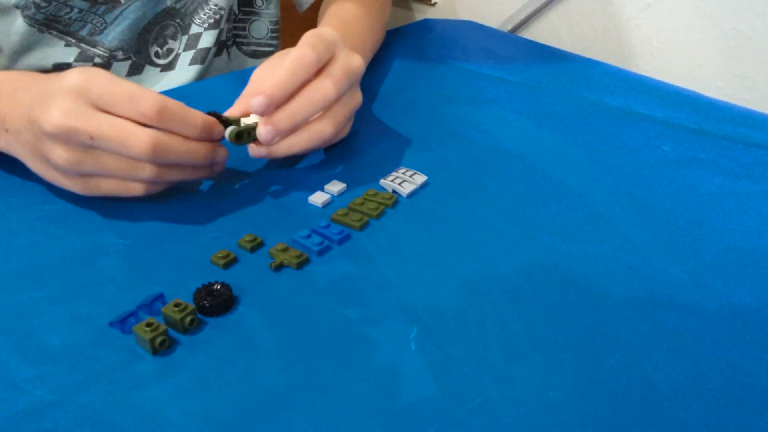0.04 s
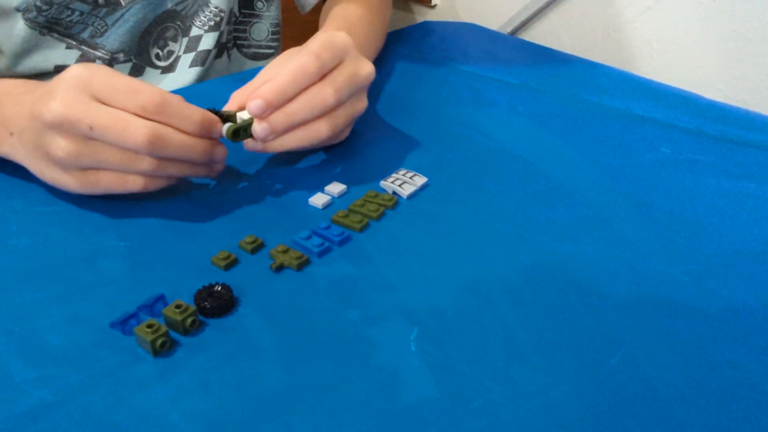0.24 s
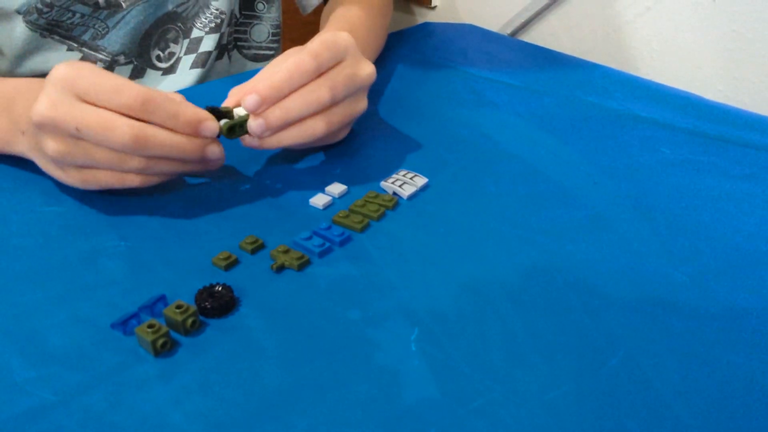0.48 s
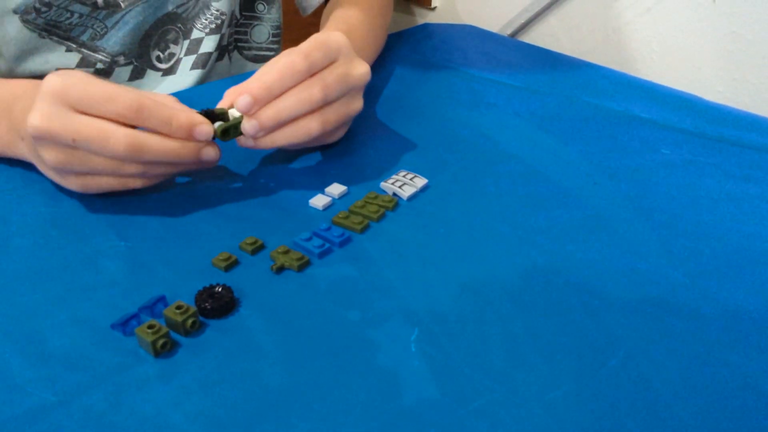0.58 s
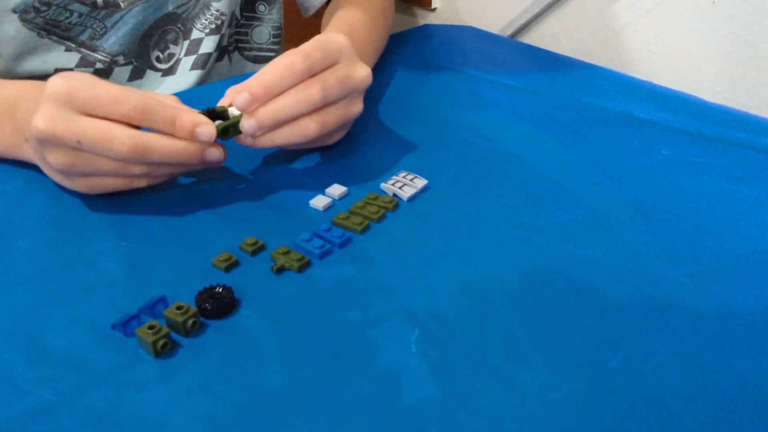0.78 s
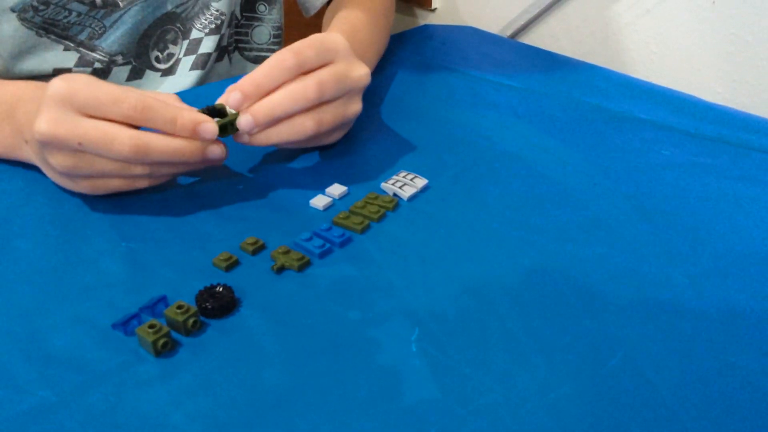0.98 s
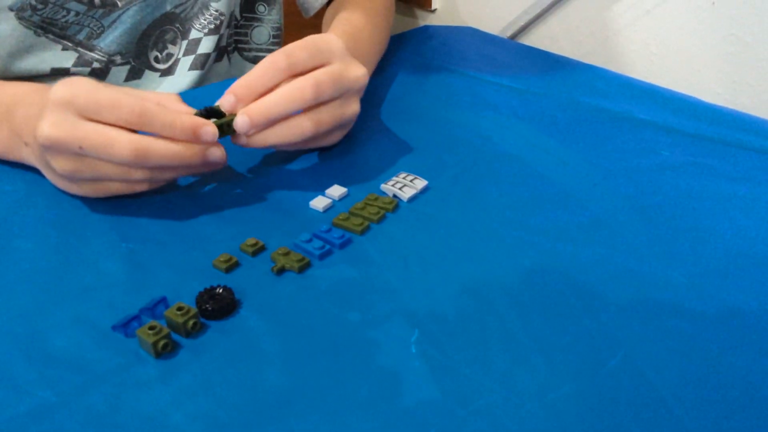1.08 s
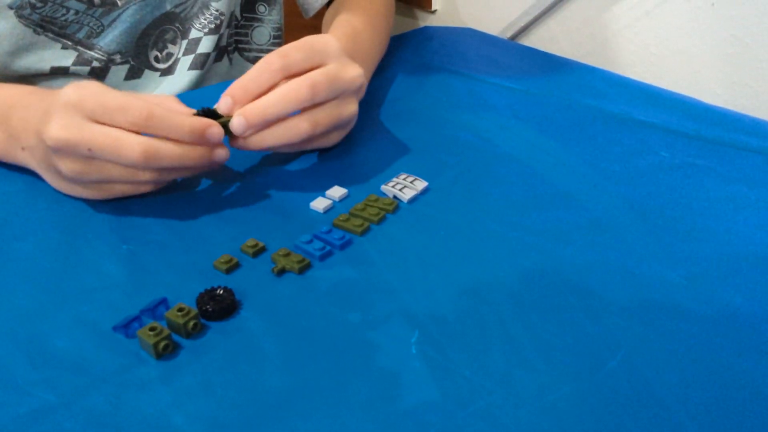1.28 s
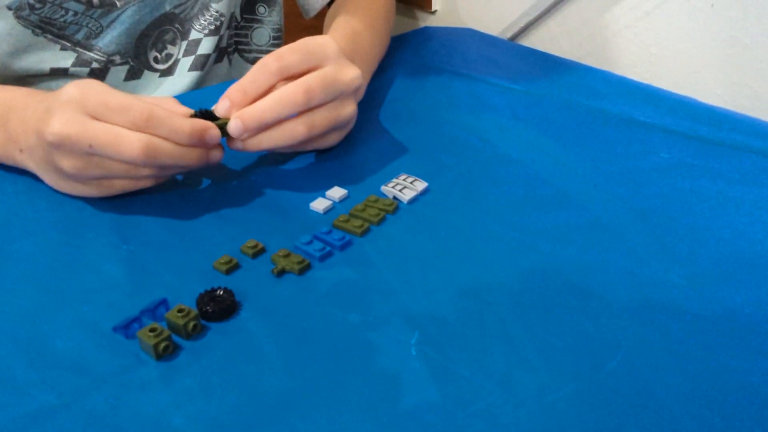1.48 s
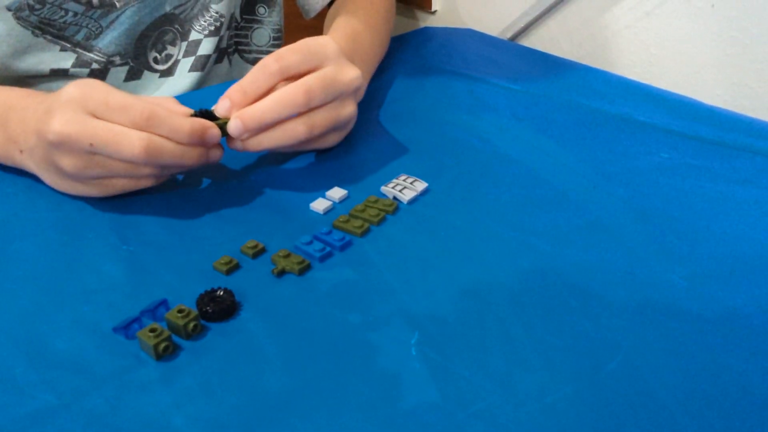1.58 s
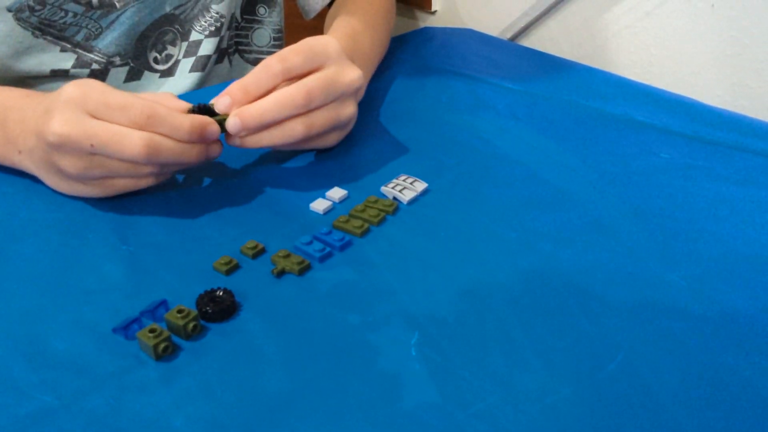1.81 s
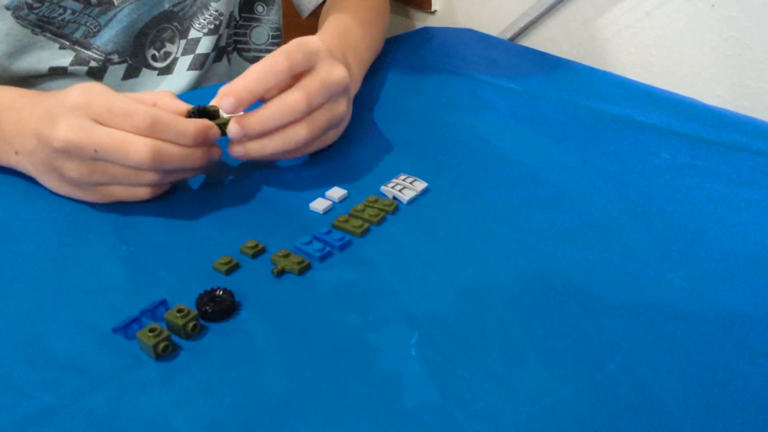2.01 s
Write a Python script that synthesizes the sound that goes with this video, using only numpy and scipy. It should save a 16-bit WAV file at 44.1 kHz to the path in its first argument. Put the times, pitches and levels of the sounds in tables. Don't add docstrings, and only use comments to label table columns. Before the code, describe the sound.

Hollow clattering knocks come in uneven bursts and end in a fast rattle, then quiet, one short plastic snap close to the microphone right of centre, and faint dull bumps over soft room hum.

```python
import sys
import numpy as np
from scipy import signal
from scipy.fft import rfft, irfft
from scipy.io import wavfile
from scipy.ndimage import uniform_filter1d, minimum_filter1d

SR = 44100
rng = np.random.default_rng(int(sys.argv[2]) if len(sys.argv) > 2 else 0)


def gain_from_decibels(decibels):
    exponent = np.asarray(decibels, float) / 20
    return 10 ** exponent


def persist_wave(psi):
    counts = np.round(np.clip(psi, -1, 1) * 32767).astype(np.int16)
    wavfile.write(sys.argv[1], SR, np.atleast_2d(counts).T)


N = 90404

TAIL, LEAD = 20480, 1024
TAIL_S = np.arange(TAIL) / SR
TAIL_HZ = np.maximum(np.arange(TAIL // 2 + 1) * SR / TAIL, 1)
LEFT_RIGHT = np.array([[1], [-1]])
BOUNCE_DIRECT_DB = 2
SHEEN_DB = 9.5


def level(x, db):
    return x * gain_from_decibels(db) / np.sqrt(np.mean(x ** 2))


def read(table, hz):
    t = np.array(table)
    return np.interp(np.log(np.maximum(hz, 1)), np.log(t[:, 0]), t[:, 1])


def causal(db):
    c = irfft(db * np.log(10) / 20)
    c[1:len(c) // 2] *= 2
    c[len(c) // 2 + 1:] = 0
    return np.exp(rfft(c))


def walk(rate_hz):
    k = int(SR / rate_hz)
    steps = np.repeat(rng.standard_normal(N // k + 1), k)
    return 2 * uniform_filter1d(uniform_filter1d(steps, k), k)[:N]


def ears(pan_db):
    return gain_from_decibels(LEFT_RIGHT * pan_db / 2)


def bump(centre_hz, width, db):
    return db / (1 + (np.log(TAIL_HZ / centre_hz) / width) ** 2)


def tilt(bright_db, thump_db):
    knee_hz = 910
    octaves = np.log2(np.maximum(TAIL_HZ, 40) / knee_hz)
    return bright_db * np.clip(octaves, 0, 2.8) - thump_db * np.clip(octaves, -2, 0)


def heard(spectrum):
    x = np.roll(irfft(spectrum), LEAD, axis=1)[:, :int(.44 * SR)]
    return x * np.minimum(np.arange(x.shape[1]) / LEAD * 2, 1)


def add(out, x, s):
    i = int(s * SR) - LEAD
    out[:, i:i + x.shape[1]] += x[:, :N - i]


def room(direct_db, build_s=0.00067):
    # (frequency [Hz], time to fall 60 dB [s], left-right likeness [0-1],
    # left minus right [dB])
    bands = [(90.8, 0.86, 1, -10), (172, 0.46, .95, 2), (328, 0.32, 0.9, -4), (707, 0.37, 0.2, -3.5),
             (1480, 0.34, 0.03, -8.5), (2828, 0.42, 0, -8), (5600, 0.3, 0.18, -8), (11314, 0.46, 0.5, -2.5)]
    fade_s, lag_s, scatter_db = .09, 0.00019, 1.6
    patchy = gain_from_decibels(scatter_db * np.repeat(rng.standard_normal(TAIL // 128), 128))
    envelope = patchy * (1 - np.exp(-TAIL_S / build_s)) * gain_from_decibels(-(TAIL_S / fade_s) ** 2)
    mid, side = rng.standard_normal((2, TAIL)) * envelope
    centres = np.log([row[0] for row in bands])
    out = 0
    for k, (_, t60, alike, pan_db) in enumerate(bands):
        share = np.interp(np.log(TAIL_HZ), centres, np.arange(len(bands)) == k)
        c = np.clip(alike, -.9, .999)
        pair = np.sqrt(1 + c) * mid + np.sqrt(1 - c) * side * LEFT_RIGHT
        pair = pair * gain_from_decibels(-60 * TAIL_S / t60)
        pair[1, 0] += gain_from_decibels(direct_db)
        pair[0, int(lag_s * SR)] += gain_from_decibels(direct_db)
        out = out + share * rfft(pair) * ears(pan_db) / np.sqrt(SR * .03)
    return out


def blow(bright_db, thump_db, hollow_hz, sheen_db=0):
    # (frequency [Hz], level [dB])
    body = [(40, -35), (120, -9), (170, -8), (350, 1.5), (500, 4.5), (800, -0.5), (2400, -7.5),
            (3300, -27.5)]
    # (frequency [Hz], level [dB])
    mic = [(3300, 9), (4400, 5), (6800, -8.5), (8000, -18), (9700, -15), (12500, -32), (15200, -22.5),
           (16500, -41.5)]
    db = read(body, TAIL_HZ) + read(mic, TAIL_HZ) + tilt(bright_db, thump_db)
    hollow = bump(hollow_hz, .16, 9)
    sheen = bump(9500, 0.066, sheen_db)
    return causal(db + hollow + sheen)


def air():
    # (frequency [Hz], level [dB per Hz])
    tone = [(25, -26.5), (55, -8), (90, -5), (140, -14.5), (450, -22), (750, -35.5), (3000, -45.5),
            (16000, -61)]
    flicker_db, alike_hz = 1.2, 900
    hum_hz, hum_width_hz = 82, 6.7
    hz = np.maximum(np.arange(N // 2 + 1) * SR / N, 1)
    swell = walk(4.2)
    out = 0
    for centre in 30 * 2 ** np.arange(0, 9.6, .5):
        band = np.maximum(1 - np.abs(np.log2(hz / centre)) * 2, 0) ** .5
        shape = gain_from_decibels(read(tone, hz)) * band
        mid, side = irfft(rfft(rng.standard_normal((2, N))) * shape, N)
        flicker = gain_from_decibels(flicker_db * (walk(10) + .5 * swell))
        out = out + flicker * (mid + min(centre / alike_hz, 1) * side * LEFT_RIGHT)
    hum = irfft(rfft(rng.standard_normal(N)) / (1 + ((hz - hum_hz) / hum_width_hz) ** 2), N)
    return level(out, -59) + level(hum, -57)


def knocks():
    # (time [s], level [dB], brightness above the knee [dB per octave],
    # thump below the knee [dB per octave], hollow resonance [Hz])
    hits = [(0.2034, -14.5, 3, 1, 516), (.5125, -17.5, 7.5, 0.5, 1016), (.675, -16.5, -0.5, 0, 393),
            (.7585, -23, 4.5, -1.5, 2030), (.193, -42, 1, -6.5, 1500), (0.2144, -19.5, -0.5, 2.5, 506),
            (.233, -21.5, 5, 2.5, 520), (0.2451, -20, -2, -2, 500), (.259, -19.5, 2, 1.5, 1500),
            (.502, -52.5, -1.5, -1.5, 1526), (.525, -17, 8, 3.5, 1610), (0.5425, -24, 11, 4, 280),
            (.685, -22, 3, -4.5, 404), (.705, -33, 2, 4, 384), (.769, -22.5, 6.5, -1, 390),
            (.846, -26.5, 2, -0.5, 2040), (.9, -31, 0, 1, 356)]
    # (frequency [Hz], level [dB], time to fall 60 dB [s],
    # left minus right [dB])
    modes = [
        (127.6, -9, 0.1, -1),
        (1597, 2.5, .012, -13.5),
        (2278, -4, 0.0077, -14),
        (1000, -4.5, 0.012, -7.5),
    ]
    fresh_count, push_s = 4, 0.0005
    ring = 0
    for hz, db, t60, pan_db in modes:
        ring = ring + ears(pan_db) * gain_from_decibels(db - 60 * TAIL_S / t60) * np.sin(2 * np.pi * hz * TAIL_S)
    front = rfft(ring * (1 - np.exp(-TAIL_S / push_s)) ** 2)
    out = np.zeros((2, N))
    for k, (s, db, bright_db, thump_db, hollow_hz) in enumerate(hits):
        fresh = k < fresh_count
        colour = blow(bright_db, thump_db, hollow_hz, SHEEN_DB * (s > .75))
        sound = gain_from_decibels(db + 27.5) * colour * room(11 if fresh else BOUNCE_DIRECT_DB)
        if fresh:
            sound = sound + gain_from_decibels(db + 4.5) * front * causal(tilt(bright_db, thump_db))
        add(out, heard(sound), s)
    return out


def clicks():
    # (time [s], level [dB], brightness [dB per octave])
    snaps = [
        (0.418, -55, 5),
        (1.1545, -62, 8),
        (1.4444, -48, 5),
        (1.4467, -39, -14.5),
        (1.4461, -21, -12.5),
        (1.4471, -27, 6),
        (1.4562, -35.5, -6.5),
        (1.6888, -54, 0),
    ]
    # (frequency [Hz], level [dB], time to fall 60 dB [s])
    modes = [(2250, 2, 0.0096), (1916, -25, .007), (3190, -10, 0.011), (3530, -11, 0.011), (4210, -2, .007),
             (4467, -8.5, 0.004), (5250, -17, 0.0028), (6200, -12, 0.0046), (7940, -15.5, .003),
             (8800, -17, 0.0035), (12000, -23.5, .002), (14800, -18.5, .003)]
    push_s, blur = 0.00038, .3
    pan_db, echo_db = -11, -5

    def ring(bright_db, share):
        x = 0
        for k, (hz, db, t60) in enumerate(modes):
            decay = gain_from_decibels(db + bright_db * np.log2(hz / 2200) - 60 * TAIL_S / (t60 * share))
            x = x + (-1) ** k * decay * np.sin(2 * np.pi * hz * TAIL_S)
        return rfft(x * (1 - np.exp(-TAIL_S / push_s)))

    out, walls = np.zeros((2, N)), room(-38.5)
    for s, db, bright_db in snaps:
        near = ring(bright_db, 1) * ears(pan_db)
        far = ring(bright_db, blur) * gain_from_decibels(echo_db) * walls
        add(out, heard(gain_from_decibels(db) * (near + far)), s)
    return out


def rattle():
    # (time [s], level [dB])
    swell = [
        (.752, -44),
        (.765, -35),
        (0.798, -31),
        (0.869, -22),
        (.92, -37),
        (0.968, -41),
        (1.019, -49.5),
        (1.04, -85),
    ]
    taps_per_s, scatter_db = 110, 3
    s, db = np.array(swell).T
    tap_db = np.interp(np.arange(N) / SR, s, db, -200, -200) + 18
    strikes = rng.random(N) < taps_per_s / SR
    taps = strikes * gain_from_decibels(scatter_db * rng.standard_normal(N) + tap_db)
    tap = heard(blow(0.64, 1.2, 349, SHEEN_DB) * room(BOUNCE_DIRECT_DB))
    return signal.fftconvolve(taps[None], tap, axes=1)[:, LEAD:N + LEAD]


def bumps():
    # (time [s], level [dB], resonance [Hz])
    thuds = [(1.09, -60, 160), (1.17, -61, 170), (1.265, -60, 493), (1.3, -60, 480), (1.345, -58, 620),
             (1.477, -42, 428), (1.49, -45.5, 630), (1.512, -42.5, 435), (1.551, -49, 317),
             (1.599, -55.5, 338), (1.70, -62, 362), (1.77, -62, 300), (1.85, -59, 400), (1.969, -59.5, 440)]
    walls = [room(-10., .01) for _ in range(4)]
    out = np.zeros((2, N))
    for k, (s, db, hz) in enumerate(thuds):
        add(out, heard(gain_from_decibels(db + 25.5) * blow(-9.5, 5.5, hz) * walls[k % 4]), s)
    return out


def trimmed(x):
    gate_db, gate_s = -63, .012
    power = uniform_filter1d((x ** 2).mean(axis=0), int(gate_s * SR))
    return x * power / (power + gain_from_decibels(gate_db) ** 2)


def scene():
    return trimmed(knocks() + rattle()) + trimmed(clicks()) + bumps() + air()


def band_limit(x):
    return signal.sosfilt(signal.butter(12, 16820, fs=SR, output="sos"), x)


def record(dry):
    low_cut_hz, ceiling = 54.4, .93
    x = signal.sosfilt(signal.butter(4, low_cut_hz, "high", fs=SR, output="sos"), dry)
    gain = minimum_filter1d(ceiling / np.maximum(np.abs(x).max(axis=0), ceiling), size=401)
    gain = uniform_filter1d(uniform_filter1d(gain, size=200), size=200)
    return band_limit(x * gain)


dry = scene()
out = record(dry)
persist_wave(out)
```